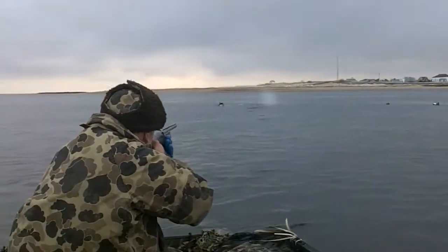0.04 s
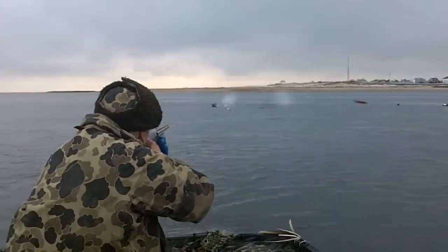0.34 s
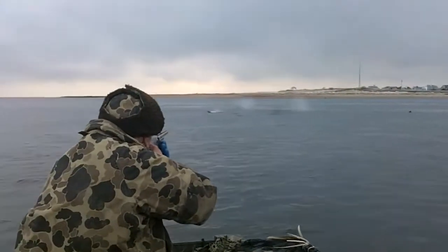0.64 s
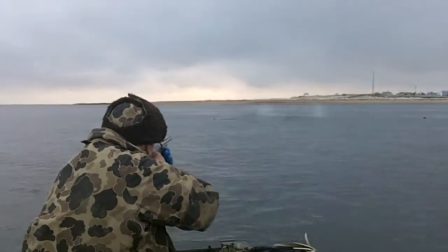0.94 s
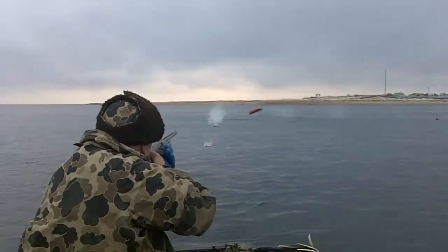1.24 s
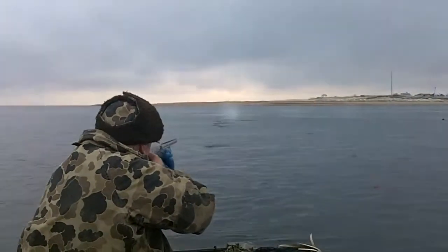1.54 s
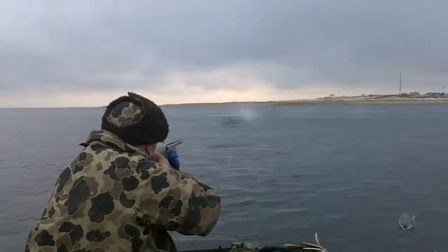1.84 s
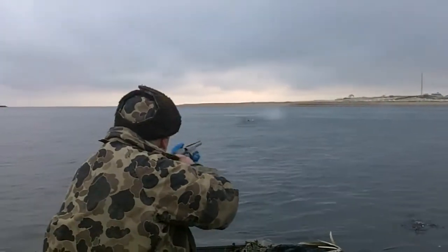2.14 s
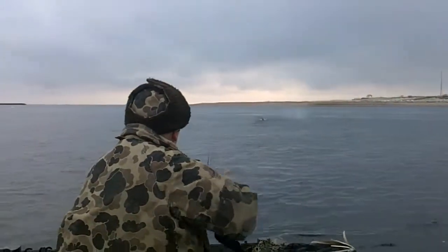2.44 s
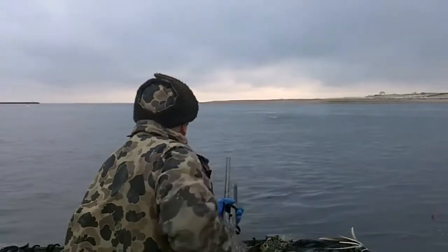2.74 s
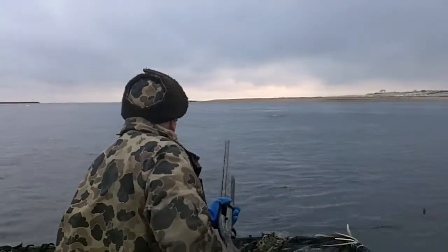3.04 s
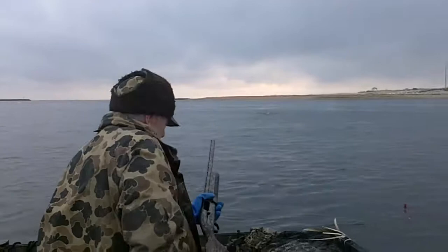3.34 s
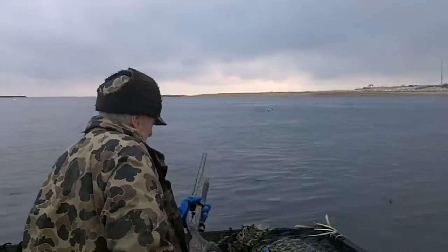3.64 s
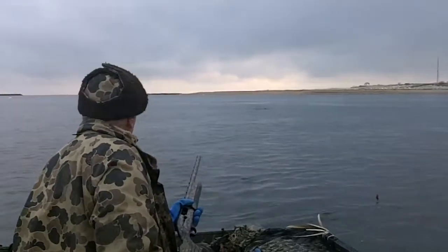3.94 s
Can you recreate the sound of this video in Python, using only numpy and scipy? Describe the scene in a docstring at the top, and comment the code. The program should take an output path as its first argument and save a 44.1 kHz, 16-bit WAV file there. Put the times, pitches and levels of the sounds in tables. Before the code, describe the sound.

Two loud shotgun blasts, a second apart, are fired from a small boat just ahead of the microphone. Each echoes across open water and pellets patter on the surface. Wind buffets throughout, with faint clicks and jacket rustling afterward.

```python
"""Two shotgun blasts from a small boat on open water, heard just behind the shooter.
Each blast overloads the microphone, rings the hull and ducks the limiter; the report rolls away
over the waves and pellets patter on the water. Wind buffets the microphone throughout.
Underneath sit ripples and plops, the gun's steel clicks, dry ticks, a rustling jacket
and one thin whistle, like a shorebird."""
import sys
import numpy as np
from scipy import signal
from scipy.fft import rfft, irfft
from scipy.io import wavfile
from scipy.ndimage import uniform_filter1d, minimum_filter1d

SR = 44100
rng = np.random.default_rng(int(sys.argv[2]) if len(sys.argv) > 2 else 0)


def output_pcm(signal):
    """Save a mono or channel-first signal as 16-bit PCM at the path in sys.argv[1].

    Samples are clipped to [-1, 1] before scaling.
    """
    pcm = np.clip(np.atleast_2d(signal).T, -1, 1) * 32767
    wavfile.write(sys.argv[1], SR, np.round(pcm).astype(np.int16))


N = 176400
T = np.arange(N) / SR
FREQS = np.arange(N // 2 + 1) * SR / N

# fader moves of the wind on the microphone: t/s, rumble level/dB, flutter level/dB
WIND_FADERS = [(0, -22, -28.5), (.2, -23.5, -38), (.45, -25, -50), (.56, -31.5, -28), (0.742, -20, -37.5),
               (.84, -33, -42.5), (1.001, -20, -37.5), (1.2, -28, -46), (1.45, -20, -29.5),
               (1.749, -24, -33), (1.93, -25, -40), (2.102, -24.5, -40), (2.2, -33.5, -40),
               (2.45, -33, -42.5), (2.699, -33, -40.5), (3.05, -29, -41), (3.25, -32.5, -42),
               (3.549, -28, -36.5), (3.701, -27.5, -42), (4.0, -30.5, -44.5)]
# low end of the wind: f/Hz, level/dB
RUMBLE_EQ = [(10, -4.5), (20, 3.5), (32, -2.5), (55, -4), (100, -10.5), (160, -20), (250, -30),
             (500, -45.5), (4000, -110)]
# low mids of the wind: f/Hz, level/dB
FLUTTER_EQ = [(60, -16), (150, 3.5), (250, -4), (400, -14), (700, -20), (1400, -29.5), (3000, -39),
              (15000, -98.5)]
# deep surges of air: t/s, level/dB, half-width/s
AIR_SURGES = [(.03, -23, 0.011), (.53, -9.5, 0.013), (1.61, -15.5, 0.0087), (1.19, -17.5, 0.019),
              (2.0, -8, 0.0078), (3.372, -13.5, 0.0066), (3.55, -15.5, 0.0072)]
# sudden shoves of wind: t/s, level/dB, half-width/s
WIND_BUFFETS = [(0.181, -21.5, 0.0051), (0.597, -7, 0.0062), (0.724, -21.5, 0.016), (0.983, -19.5, 0.0071),
                (1.095, -19, 0.0072), (1.517, -19.5, 0.0098), (1.622, -14.5, 0.0038),
                (1.724, -15.5, 0.0076), (1.758, -16.5, 0.0076), (1.822, -19, 0.007), (2.003, -21, 0.0048),
                (2.081, -22, 0.028), (2.517, -30, 0.0066), (2.721, -22.5, 0.0057), (2.944, -24, 0.0037),
                (3.023, -28, 0.0075), (3.08, -18.5, 0.0066), (3.371, -30, 0.0061), (3.469, -20.5, 0.014),
                (3.558, -29.5, 0.015), (3.778, -25, 0.0088), (3.935, -30.5, 0.014)]
# dull body of a buffet: f/Hz, level/dB
BUFFET_EQ = [(25, -10), (90, 4.5), (200, 3), (350, -2), (550, -15), (900, -40.5), (2000, -46.5),
             (15000, -93.5)]
# eddies snapping across the microphone port: t/s, level/dB
PORT_EDDIES = [(0.596, -4), (1.499, -1.5), (1.518, -2.5), (1.6014, -1.5), (1.617, -1), (1.676, -7.5),
               (1.719, -9.5), (1.731, -4.5), (1.745, -16), (1.815, -16.5), (2.004, -8.5), (3.077, -15)]
# fizz of the ripples: f/Hz, level/dB
RIPPLE_EQ = [(200, -15.5), (700, -8.5), (2000, 0), (4300, 2.5), (7000, -8.5), (10000, -11.5),
             (15000, -24)]
# clicks of the gun's action: t/s, level/dB
ACTION_CLICKS = [(0.1881, -50), (0.1965, -43), (.9482, -37.5), (1.998, -49)]
# modes of its steel parts: f/Hz, level/dB, t60/s
STEEL_MODES = [(2540, -7, .025), (4460, -0.5, .022), (4760, 7.5, 0.013), (6440, -3, 0.02),
               (9800, -17.5, 0.0093)]
# sharp ticks and clacks: t/s, level/dB, tilt/(dB/octave), decay/s
DRY_TICKS = [(0.188, -28, 7.5, 0.0022), (.389, -14, 11, 0.0069), (0.949, -42, 10, 0.0023),
             (1.0196, -33, 1.5, 0.0029), (1.164, -45, -1.5, 0.011), (2.0255, -39.5, -2.5, 0.0035),
             (2.397, -45, 10, 0.0035), (2.4643, -37, 11.5, 0.005), (2.813, -40, 10, .002),
             (3.273, -32, 3.5, 0.0032), (3.4221, -25.5, 3.5, 0.00012)]
# bite of a tick or a pellet slap: f/Hz, level/dB
CRACK_EQ = [(200, -23), (1000, 6), (2200, 8), (4300, 1), (7000, -17), (11000, -25.5), (15000, -34.5)]
# moves of the jacket: t/s, level/dB, half-width/s, tilt/(dB/octave)
JACKET_RUSTLES = [(0.216, -48, 0.014, -9.5), (2.092, -63, 0.27, -1), (2.341, -56, 0.035, -1.5),
                  (2.839, -54.5, 0.11, -0.5), (2.939, -54, 0.07, -3.5), (3.293, -58.5, 0.17, -1),
                  (3.501, -45, 0.022, -7.5), (3.72, -59, 0.096, -2.5)]
# rubbing cloth: f/Hz, level/dB
CLOTH_EQ = [(300, -21), (1500, 3), (4300, 4.5), (7000, -2), (10000, -9.5), (15000, -11)]
# the shots: t/s, level/dB, overload hold/s, tilt/(dB/octave), echo level/dB, echo length/factor
GUNSHOTS = [(0.2604, 9.5, 0.0088, 0, 0, 1.015), (1.2559, 12.5, 0.0094, -0.5, -.5, 0.87)]
# muzzle blast: f/Hz, level/dB
MUZZLE_EQ = [(40, 3), (120, -0.5), (250, -5), (550, -5), (800, -8.5), (2000, -6), (4300, -6.5), (6500, -13),
             (10000, -18.5), (15000, -19.5)]
# hull and gear ringing under the blast: f/Hz, level/dB, t60/s
HULL_MODES = [(261, -4, 0.044), (558, -3, 0.021), (1012, -7, .04), (1825, -23, .05), (2100, -20.5, 0.047),
              (3480, -25, 0.034), (4540, -21, .09)]
# bands of the report rolling back over the water: f/Hz, level/dB, t60/s
ECHO_BANDS = [(247, -35, 1.7), (460, -26, 1.48), (938, -23, 1.13), (2000, -18.5, 0.76), (4000, -28, 0.86),
              (7000, -35.5, 0.72), (12000, -39.5, 0.72)]
# strings of shot landing on the water: t/s, level/dB, tilt/(dB/octave), hold/s
PELLET_SHOWERS = [(0.418, -29.5, -6.5, 0.1), (1.396, -21, 3.5, 0.031), (1.475, -38, -4.5, 0.06)]
# patter of the pellets: f/Hz, level/dB
PELLET_EQ = [(300, -14.5), (1200, 2.5), (2200, -3.5), (4000, -3), (6000, -17), (10000, -27.5), (15000, -52)]
# loud single slaps of shot on the water: t/s, level/dB
PELLET_SLAPS = [(.3778, -15), (0.418, -23), (0.44, -23), (0.4494, -16), (.498, -24), (0.525, -30),
                (0.5739, -32.5), (1.388, -14), (1.3939, -15.5), (1.399, -16), (1.4175, -16), (1.422, -17),
                (1.4435, -19), (1.461, -19.5), (1.508, -37), (1.54, -32)]
# water plops by the hull: t/s, level/dB, f/Hz, t60/s
WATER_PLOPS = [(1.5674, -14, 1096, 0.019), (1.568, -11.5, 1560, 0.008), (1.894, -6, 686, 0.0059),
               (1.021, -31, 780, 0.06), (3.211, -34.5, 600, 0.085), (3.238, -32.5, 905, 0.043)]
# contour of the whistle: t/s, f/Hz, level/dB
WHISTLE_CONTOUR = [(2.125, 3715, -73), (2.15, 3720, -60), (2.239, 3666, -52.5), (2.287, 3693, -46.5),
                   (2.314, 3640, -54.5), (2.335, 3680, -65)]
# notches of the microphone housing, and one narrow lift in the high treble: f/Hz, half-width/Hz, gain/dB
TREBLE_EQ = [(2733, 294, -13.5), (5490, 330, -16), (7926, 450, -25), (10900, 170, -12.5), (11550, 220, 3.5),
             (13150, 450, -11)]


def amp(db):
    """Decibels to gain."""
    return 10 ** (np.asarray(db) / 20)


def unit(x):
    """Scale to rms 1."""
    return x / np.sqrt(np.mean(x ** 2))


def colour(x, eq, tilt_db=0):
    """Shape x with an EQ curve of (f/Hz, level/dB) points, tilted per octave; rms 1."""
    hz, db = np.array(eq, float).T
    curve_db = np.interp(np.log2(FREQS + 1), np.log2(hz), db + tilt_db * np.log2(hz))
    return unit(irfft(rfft(x) * amp(curve_db), N))


def noise(eq, tilt_db=0):
    """Noise through an EQ curve; rms 1."""
    return colour(rng.standard_normal(N), eq, tilt_db)


def wobble(rate_hz):
    """Modulator that glides between random values; rms 1."""
    step = int(SR / rate_hz)
    stairs = np.repeat(rng.standard_normal(N)[:N // step + 1], step)
    return unit(uniform_filter1d(stairs, step)[:N])


def grains(per_s):
    """Random clicks of random size."""
    return (rng.random(N) < per_s / SR) * rng.standard_normal(N)


def rise(start, rise_s):
    """Soft attack from 0 to 1."""
    return 1 - np.exp(-np.maximum(T - start, 0) / rise_s)


def fall(start, decay_s, hold_s=0):
    """Hard attack, hold, exponential decay."""
    return (T >= start) * np.exp(-np.clip((T - start - hold_s) / decay_s, 0, 50))


def swell(at, width_s):
    """Bell-shaped fade in and out."""
    return np.exp(-np.minimum(((T - at) / width_s) ** 2, 20))


def cusp(at, width_s):
    """A pointed peak that falls away on both sides."""
    return np.exp(-np.minimum(abs(T - at) / width_s, 20))


def ring(start, hz, t60):
    """One struck mode."""
    return fall(start, t60 / np.log(1000)) * np.sin(2 * np.pi * hz * (T - start))


def crack(start, tilt_db, decay_s):
    """A short, dry snap of noise."""
    return noise(CRACK_EQ, tilt_db) * fall(start, decay_s)


def wind(rumble_trim_db=4.5, flutter_trim_db=1.5, swing_db=3.5):
    """Air pushes on the microphone: deep surging rumble, restless flutter and sudden buffets."""
    times, rumble_db, flutter_db = np.array(WIND_FADERS).T
    surges = sum(amp(db) * swell(at, width) for at, db, width in AIR_SURGES)
    rumble = noise(RUMBLE_EQ) * (amp(np.interp(T, times, rumble_db) + rumble_trim_db) + surges)
    flutter = noise(FLUTTER_EQ) * amp(np.interp(T, times, flutter_db) + flutter_trim_db)
    flutter *= amp(swing_db * np.tanh(wobble(45)))
    buffets = sum(amp(db) * cusp(at, width) for at, db, width in WIND_BUFFETS)
    return rumble + flutter + noise(BUFFET_EQ) * buffets


def ripples(level_db=-63.5, side_db=-8.5):
    """A faint, shimmering bed of water: one centre layer, plus a quieter one for each port."""
    lapping = amp(level_db + wobble(19))
    sides = np.array([noise(RIPPLE_EQ) for _ in range(2)])
    return (noise(RIPPLE_EQ) + amp(side_db) * sides) * lapping


def ticks():
    """Scattered dry ticks and clacks, most of them bright."""
    return sum(amp(db) * crack(at, tilt, decay) for at, db, tilt, decay in DRY_TICKS)


def gun_action():
    """Small steel parts snap and ring briefly."""
    return sum(amp(db + mode_db) * ring(at, hz, t60)
               for at, db in ACTION_CLICKS for hz, mode_db, t60 in STEEL_MODES)


def jacket(side_db=-8.5):
    """Threads catch and slip in scratchy swells; a softer hiss at each port adds width."""
    threads = (rng.standard_normal(N) + unit(grains(per_s=450))) * amp(2 * wobble(70))
    sides = amp(side_db) * np.array([noise(CLOTH_EQ) for _ in range(2)])
    return sum(amp(db) * swell(at, width) * (colour(threads, CLOTH_EQ, tilt) + sides)
               for at, db, width, tilt in JACKET_RUSTLES)


def blasts(drive=0.99, thump_db=-12.5, thump_s=0.0049, scatter_db=-13.5):
    """A pressure thump, a saturated burst of shock and near reflections, short scatter, hull ring."""
    out = 0
    for start, db, hold, tilt, _, _ in GUNSHOTS:
        thump = amp(thump_db) * fall(start, thump_s) * (1 - (T - start) / thump_s)
        shock = noise(MUZZLE_EQ, tilt) * fall(start, decay_s=0.0046, hold_s=hold)
        burst = np.tanh(drive * shock) / drive
        scatter = amp(scatter_db) * noise(MUZZLE_EQ, tilt) * fall(start, decay_s=0.037)
        hull = sum(amp(mode_db) * ring(start, hz, t60) for hz, mode_db, t60 in HULL_MODES)
        out += amp(db) * (thump + (burst + scatter + hull) * rise(start, rise_s=0.0013))
    return out


def rolling_echo(predelay_s=0.02, attack_s=0.039):
    """Waves scatter the report back from ever farther away, in gritty clumps; the treble dies first."""
    out = 0
    for hz, db, t60 in ECHO_BANDS:
        band = noise([(hz / 4, -60), (hz / 1.35, 0), (hz * 1.35, 0), (hz * 2.4, -60)])
        decay_s = t60 / np.log(1000)
        tails = sum(amp(echo_db) * rise(at + predelay_s, attack_s) * fall(at, stretch * decay_s)
                    for at, _, _, _, echo_db, stretch in GUNSHOTS)
        out += amp(db) * band * tails
    grit_db = 0.82 * wobble(60) + 2 * wobble(400)
    return out * amp(grit_db)


def pellets(attack_s=0.013, decay_s=0.051):
    """The string of shot patters on the water, a few slaps far louder than the rest."""
    hits = grains(per_s=650)
    patter = sum(amp(db) * colour(hits, PELLET_EQ, tilt) * rise(at, attack_s) * fall(at, decay_s, hold)
                 for at, db, tilt, hold in PELLET_SHOWERS)
    slaps = sum(amp(db) * crack(at, tilt_db=2.1, decay_s=0.0022) for at, db in PELLET_SLAPS)
    return patter + slaps


def eddies(width_s=0.001, spread=4):
    """Eddies pop across the microphone port: a sharp suction inside a wider, softer rebound."""
    pops = sum(amp(db) * (cusp(at, width_s * spread) / spread - cusp(at, width_s))
               for at, db in PORT_EDDIES)
    return uniform_filter1d(pops, size=16)


def plops(high_cut_hz=1540):
    """Water plops by the hull: short pitched rings with the top rolled off."""
    rings = sum(amp(db) * ring(at, hz, t60) for at, db, hz, t60 in WATER_PLOPS)
    return signal.sosfilt(signal.butter(8, high_cut_hz, fs=SR, output="sos"), rings)


def whistle():
    """One thin note, nearly level in pitch, that swells and breaks off."""
    times, hz, db = np.array(WHISTLE_CONTOUR).T
    pitch = np.interp(T, times, hz) * (1 + 0.002 * wobble(120))
    envelope = amp(np.interp(T, times, db)) * (T > times[0]) * (T < times[-1])
    return np.sqrt(2) * np.sin(2 * np.pi * np.cumsum(pitch) / SR) * envelope


def scene(port_lag_s=0.00002):
    """Sound from ahead reaches the right port just before the left; the wind sits dead centre."""
    ahead = blasts() + rolling_echo() + pellets() + gun_action() + ticks() + plops() + whistle()
    late = irfft(rfft(ahead) * np.exp(-2j * np.pi * FREQS * port_lag_s), N)
    return np.array([late, ahead]) + wind() + eddies() + ripples() + jacket()


def treble_eq(x):
    """The microphone housing carves a row of notches; one narrow band of high treble is lifted."""
    curve_db = sum(db * np.exp(-((FREQS - hz) / width) ** 2) for hz, width, db in TREBLE_EQ)
    cepstrum = irfft(np.log(amp(curve_db)), N)
    cepstrum[1:N // 2] *= 2  # fold to minimum phase: no pre-ring ahead of the transients
    cepstrum[N // 2 + 1:] = 0
    return irfft(rfft(x) * np.exp(rfft(cepstrum)), N)


def limiter(x, threshold_db=-8, hold_s=0.094, release_s=0.075):
    """The gain ducks at once under a loud sound, holds, then recovers."""
    power = uniform_filter1d(np.mean(x ** 2, axis=0), size=400)
    duck_db = np.minimum(threshold_db - 10 * np.log10(np.maximum(power, 1e-12)), 0)
    half = int(hold_s * SR / 2)
    held_db = minimum_filter1d(duck_db, 2 * half + 1, origin=half, mode="nearest")
    pole = np.exp(-1 / (release_s * SR))
    released_db = signal.lfilter([1 - pole], [1, -pole], held_db)
    return x * amp(np.minimum(held_db, released_db))


def record(dry, ceiling=0.97, high_cut_hz=15000):
    """The output chain: treble EQ, limiter, soft clip near full scale and a steep high cut."""
    limited = limiter(treble_eq(dry))
    clipped = limited / (1 + (limited / ceiling) ** 6) ** (1 / 6)
    return signal.sosfilt(signal.ellip(8, .2, 80, high_cut_hz, fs=SR, output="sos"), clipped)


dry = scene()
out = record(dry)
output_pcm(out)
```